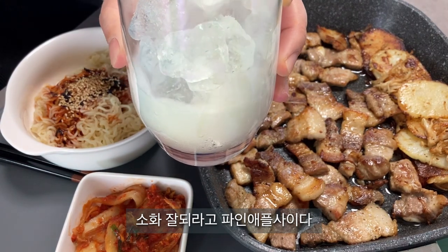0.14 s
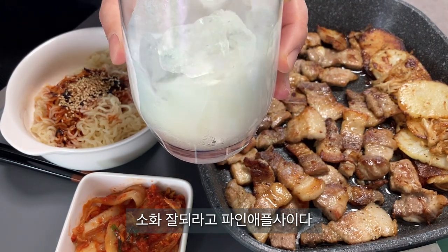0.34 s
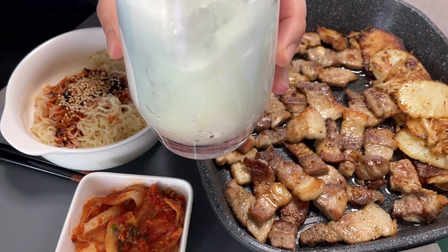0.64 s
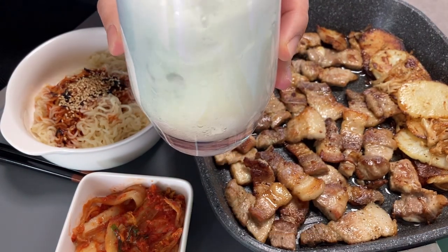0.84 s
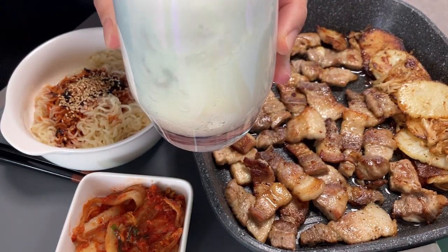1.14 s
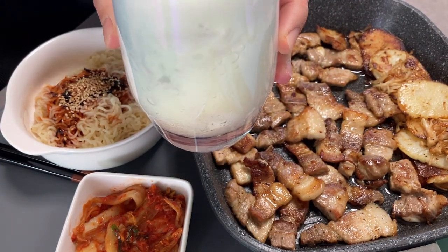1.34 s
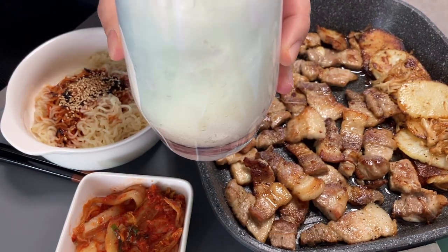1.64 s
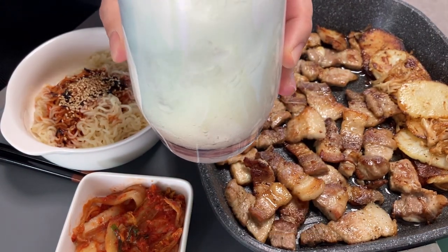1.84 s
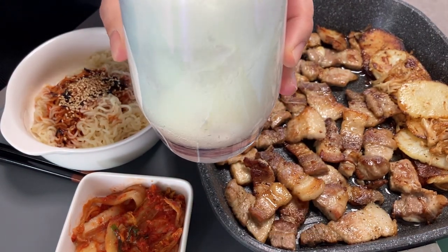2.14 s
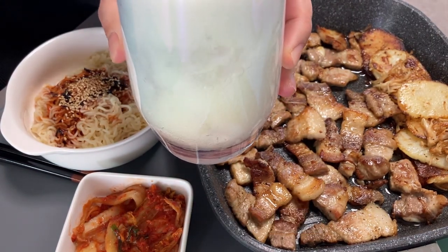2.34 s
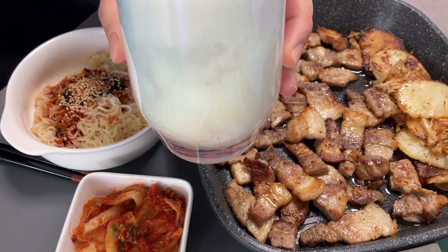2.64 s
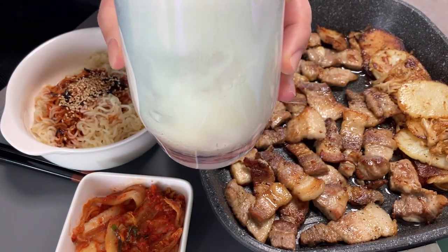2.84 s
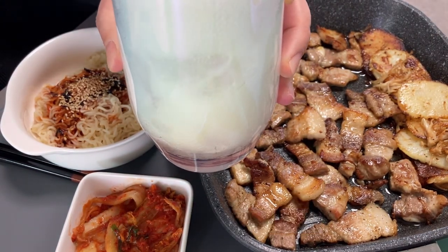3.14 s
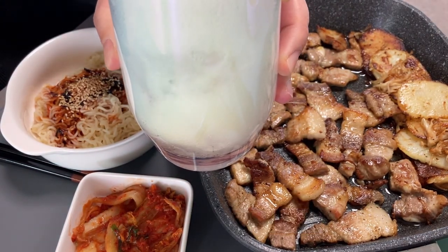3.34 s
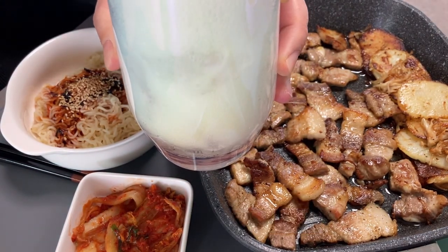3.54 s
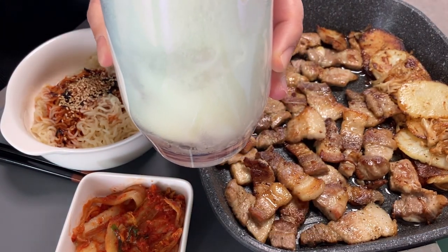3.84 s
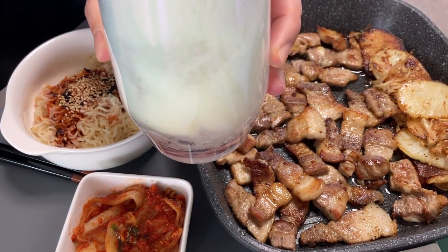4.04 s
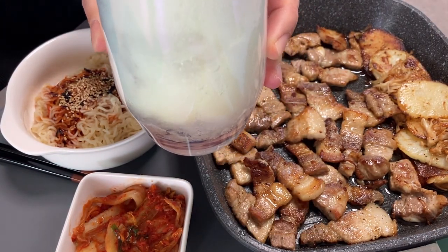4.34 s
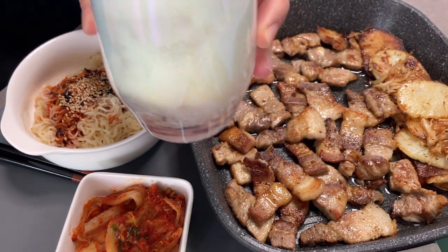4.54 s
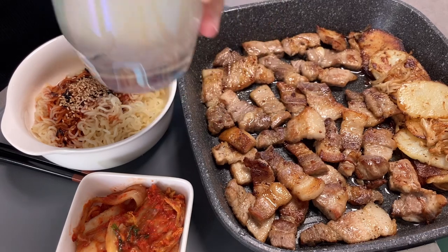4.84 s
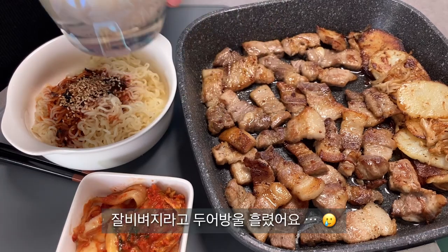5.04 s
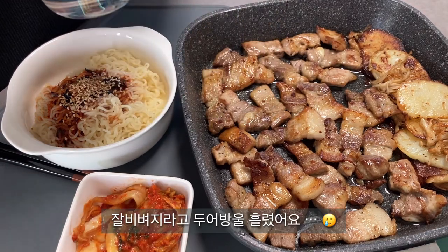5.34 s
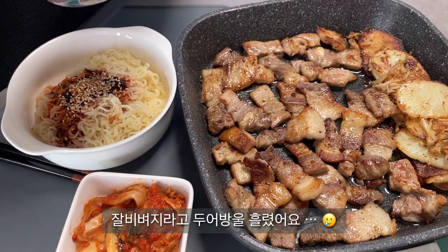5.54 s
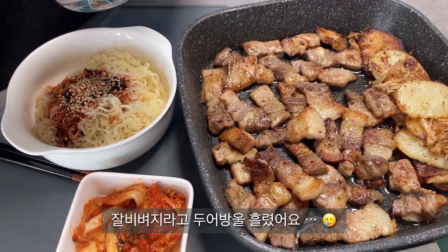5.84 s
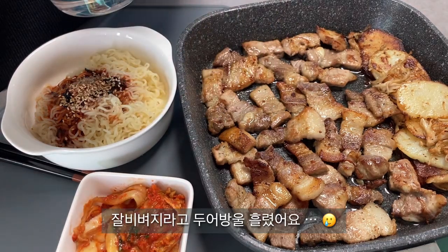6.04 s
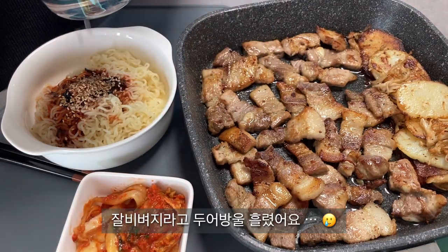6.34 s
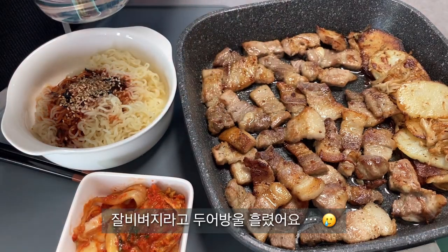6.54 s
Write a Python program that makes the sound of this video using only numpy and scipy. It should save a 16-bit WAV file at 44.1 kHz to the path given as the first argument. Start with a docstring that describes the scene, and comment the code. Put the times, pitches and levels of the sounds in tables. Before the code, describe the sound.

A close stereo phone pickup of fizzy drink over ice in a small, quiet kitchen. From 0 s a fine bright bubble hiss runs steadily while ice cracks in dry, glassy snaps, dense until about 2.1 s; the strongest come near 0.8, 1.25, 1.6, 1.7 and 2.0 s, some with a soft low thump and a sputter of gas. Quiet rising gulps, low and mid pitched, bubble up until 2.3 s. Then cracks are rare: 2.5, 2.9, a sharp pair at 3.3, faint ones at 4.05 and 4.55 s. The fizz thins while a faint hollow foam tone climbs. Around 5.25 s a soft airy swish, and at 5.4 s the glass lands with knocks and a strong woody rub, then slides in weaker juddering shoves, with gritty scrape and ticks, until about 6.3 s. Low room air and a thin whine to the right remain.

```python
"""Close on a phone, fizzy soda stands over ice in a glass: popping bubbles hiss, filtered noise bursts snap as ice.
Early on, rising tones gulp as trapped air escapes, and short falling thumps follow the big cracks.
Meanwhile the foam's hollow note, a moving resonance on tiny pops, climbs as the foam drains.
Near the end filtered noise swishes softly; the glass is set down and shoved over the table with judder, grit, ticks.
A small kitchen surrounds it all with short echoes, steady room air and a faint whine off to the right."""
import sys
import numpy as np
from scipy import signal
from scipy.fft import rfft, irfft, next_fast_len
from scipy.io import wavfile
from scipy.ndimage import uniform_filter1d, map_coordinates

SR = 44100
rng = np.random.default_rng(int(sys.argv[2]) if len(sys.argv) > 2 else 0)


def inscribe(sig):
    """Save sig as 16-bit PCM at rate SR to the path in sys.argv[1].

    A 1-D sig is mono; a 2-D sig holds one channel per row.
    Samples are clipped to [-1, 1] before scaling.
    """
    pcm = np.round(np.clip(np.atleast_2d(sig).T, -1, 1) * 32767)
    wavfile.write(sys.argv[1], SR, pcm.astype(np.int16))


N = 294588
TIME = np.arange(N) / SR


# ice cracks: start_s, relative level_db, relative body_db, brightness_db, list of cube pitch_hz
ICE_CRACKS = [(0.031, -34, -13, 2, [5400]), (0.0487, -18.5, -36, 12, [11000]),
              (0.1096, -34.5, -18, 2, [5000]), (0.221, -18.5, -7.5, -3, [4750, 7780, 13200, 3700]),
              (0.249, -30.5, -10, -1, [7740]), (0.308, -40, -3, -8, [7000]), (0.355, -30, -19, 12, [11500]),
              (0.3865, -37, -10, 0, [9800]), (0.683, -25, -10, 13, [14800]),
              (0.808, -10.5, -15.5, 14.5, [10800, 12900, 14800, 16200]), (0.819, -26.5, -5, 2, [8100]),
              (0.921, -35.5, -16, 6, [10800]), (1.066, -26, -14.5, 1, [11400, 10400]),
              (1.1627, -21.5, -12, 7.5, [10000, 12400, 11600]), (1.218, -22.5, -16, -7, [12300]),
              (1.2571, -14.5, -7, 1.5, [11000, 8704, 13820, 5000]), (1.468, -30.5, -11, 2, [11400]),
              (1.6058, -12, -15, 5.5, [12300, 8150, 11300, 4620]), (1.6121, -18, -10, 10, [12000, 14800]),
              (1.71, -9.5, -6.5, 19, [15400, 15700, 11800]), (1.7226, -30.5, -10, 4, [14700]),
              (1.831, -24.5, -51, 7, [13000, 15000]), (2.0273, -11, -8.5, 5.5, [7700, 8700, 14100]),
              (2.047, -39, -5, -14, [5100]), (2.0653, -35.5, -9, -1, [8700]),
              (2.4736, -26, -7.5, -4, [8600, 10800, 12000]), (2.9326, -32.5, -5, 4, [11000]),
              (3.2833, -12.5, -20.5, 0.5, [14500, 7600, 10370, 4730]),
              (3.288, -14, -13.5, 8, [11000, 10400, 12500]), (4.0457, -24, -5, -3, [7300, 8600, 12000]),
              (4.5547, -42.5, -3, 0, [7000]), (5.3164, -34.5, -5.5, -6, [10500])]
# colour of a crack: freq_hz, gain_db
ICE_COLOUR = [(700, -28), (1300, -13), (2200, -18), (3300, -19.5), (4800, -12.5), (6200, -10.5),
              (7300, -7.5), (8200, -4.5), (9200, -1), (11300, -6), (13200, -4.5), (15000, -7.5),
              (16300, -6)]
# rings of the filled glass: freq_hz, width_hz, lift_db
GLASS_RINGS = [(2330, 270, 5), (4730, 57, 3.5), (8300, 280, 9), (10900, 1800, 5), (12530, 750, 4.5),
               (14960, 1400, 6)]


def cracks(life_s=0.00082, decay_power=0.71, rise_s=0.0001, level_db=3.5, body_db=13, side_db=-9,
           split_db=9, room_db=-15, cube_width_hz=430, cube_db=10, neighbour_db=3):
    """Each fracture runs through a cube in a few milliseconds; cube and glass ring briefly, the room answers."""
    direct, thrown = np.zeros((2, N)), np.zeros((2, N))
    t = np.arange(SR // 30) / SR
    shape = np.exp(-(t / life_s) ** decay_power) * (1 - np.exp(-t / rise_s))
    # a single-sample click 0.4 ms into the burst
    split = amp(split_db) * (np.arange(len(t)) == SR // 2500)
    for start_s, db, body, bright, pitches in ICE_CRACKS:
        low_lift = body + body_db
        tint = [(3500, low_lift), (6000, low_lift / 2 - bright / 4), (8200, -bright / 2),
                (11000, 0), (14500, bright / 2)]
        colour = lambda hz: along(ICE_COLOUR, hz) + along(tint, hz)
        # strong modes of the cube, and weaker ones of its neighbours that differ from crack to crack
        cube = [(f, cube_width_hz, cube_db) for f in pitches]
        neighbours = [(f, cube_width_hz / 2, neighbour_db) for f in rng.uniform(2350, 8130, size=6)]
        rings = GLASS_RINGS + cube + neighbours
        burst = split + shape * spread(rng.standard_normal((2, len(t))), side_db)
        snap = coloured(burst, lambda hz: colour(hz) + lifts(rings, hz), size=1024)
        strength = amp(db + level_db) * np.sqrt(0.006 * SR)
        add(direct, start_s, strength * snap / np.linalg.norm(snap))
        # summed over all directions, the sound that reaches the walls has a smoother colour
        flash = coloured(np.array([split, split]), lambda hz: colour(hz) + lifts(cube, hz) / 2, size=1024)
        add(thrown, start_s, strength * flash / np.linalg.norm(flash))
    return direct + amp(room_db) * kitchen(thrown)


# state of the foam: time_s, hiss_db, relative seething_db, finest_fizz_db
FOAM_LEVELS = [(0, -45.5, -59, -62), (0.6, -44.5, -58.5, -50), (1.05, -47.5, -52, -59),
               (1.5, -48, -47, -78), (1.82, -53, -56.5, -67), (2.0, -51.5, -48.5, -74),
               (2.6, -50, -50.5, -58), (3.5, -49.5, -49.5, -53.5), (4.0, -51, -48.5, -48.5),
               (4.5, -52.5, -51.5, -54.5), (5.0, -56.5, -56.5, -58.5), (6.68, -58, -59.5, -58)]
# the foam's hollow note: time_s, pitch_hz, level_db
HOLLOW_NOTE = [(0, 606, -62), (1.2, 1080, -62.5), (2.35, 1240, -57), (3.2, 1600, -54.5), (4.1, 2440, -55),
               (5.3, 2650, -60)]
# colour of bursting bubbles: freq_hz, gain_db
HISS_COLOUR = [(2800, -22), (4000, -2.5), (5200, -5), (6800, 0), (8500, 3.5), (11000, 0.5), (13000, -0.5),
               (15500, -8.5)]
# colour inside the foam: freq_hz, gain_db
SEETHE_COLOUR = [(900, -15), (2200, -12), (3300, -1.5), (4600, 2), (6200, -3.5), (9000, -9)]
# colour of the finest bubbles at the top of the head: freq_hz, gain_db
FINE_COLOUR = [(6000, -18.5), (9000, -5), (11500, 2), (15500, -6.5)]
# air in the glass above the foam: freq_hz, width_hz, lift_db
AIR_SPACE_MODES = [(2690, 1960, 11)]


def foam(seethe_db=-4.0, sharpness=3.5, flutter_db=0.83, flare_db=11, deep_flare_db=12, flare_s=0.028,
         sputter_db=3, patch_db=1.77):
    """Thousands of bubbles burst each second; the foam resonates ever higher as it thins."""
    hiss, seethe, fine = curves(FOAM_LEVELS)
    top_pops = spread(pops(rate=14000, scatter_db=-1.0), -11.5)
    top = unit(coloured(top_pops, lambda hz: along(HISS_COLOUR, hz)))
    deep_pops = spread(pops(rate=9000, scatter_db=-1.5), -13.0)
    deep = unit(coloured(deep_pops, lambda hz: along(SEETHE_COLOUR, hz) + lifts(AIR_SPACE_MODES, hz)))
    head_pops = spread(pops(rate=22000, scatter_db=6.0), -2.3)
    head = unit(coloured(head_pops, lambda hz: along(FINE_COLOUR, hz)))

    # a resonance that follows the hollow note, excited by sparser pops
    hz, t, z = signal.stft(spread(pops(rate=2000, scatter_db=2.5), -14.5), SR, nperseg=512)
    note_s, note_hz, note_db = np.transpose(HOLLOW_NOTE)
    ratio = (hz[:, None] + 1) / np.interp(t, note_s, note_hz)
    peak = 1 / (1 + (sharpness / 2 * (ratio - 1 / ratio)) ** 2)
    note = unit(signal.istft(z * peak / np.linalg.norm(peak, axis=0), nperseg=512)[1][:, :N])

    # each crack frees a sputtering puff of gas
    freed = sum(amp(db) * swell(start_s, flare_s / 10, flare_s) for start_s, db, *_ in ICE_CRACKS)
    freed = freed * amp(sputter_db * wobble(150))
    surface = amp(hiss) * top + amp(fine) * head
    inside = amp(seethe + seethe_db) * deep
    fizz = (1 + amp(flare_db) * freed) * surface + (1 + amp(deep_flare_db) * freed) * inside
    # narrow bands of the fizz swell and fade at random
    fizz = amp(flutter_db * wobble(16)) * patchy(fizz, patch_db)
    return fizz + amp(np.interp(TIME, note_s, note_db)) * note


# air escaping from under the ice: start_s, pitch_hz, relative level_db, life_cycles to fall 60 dB
AIR_GULPS = [(.05, 151, -38, 8), (.127, 132, -31, 9.8), (0.3636, 754, -28, 15), (.46, 710, -39, 11),
             (.484, 116, -30, 7.3), (.522, 187, -41, 9), (0.885, 213, -37, 7.8), (0.9197, 740, -32.5, 11.5),
             (0.925, 250, -40, 12.5), (0.941, 850, -39, 17), (1.6125, 706, -23, 8.6),
             (2.0965, 626, -28, 3.7), (2.162, 105, -44, 6), (2.3005, 900, -36, 8.2)]


def gulps(climb=0.31, swell_cycles=1.08, slap=0.24, slap_t60_s=0.034):
    """A freed air pocket slaps the ice, then rings and rises in pitch on its way up."""
    out, t = np.zeros(N), np.arange(SR // 6) / SR
    for start_s, hz, db, life in AIR_GULPS:
        cycles = hz * t
        envelope = 2 * amp(-60 * cycles / life) * (1 - np.exp(-cycles / swell_cycles))
        ring = envelope * np.sin(2 * np.pi * cycles * (1 + climb * cycles / life))
        band = signal.butter(N=2, Wn=[hz / 2, hz * 2], btype="band", fs=SR)
        wet = unit(signal.lfilter(*band, rng.standard_normal(len(t))))
        add(out, start_s, amp(db) * (ring + slap * wet * amp(-60 * t / slap_t60_s)))
    return out


# jolts of the drink by big cracks: start_s, level_db
DRINK_JOLTS = [(0.8101, -28.5), (1.258, -32.5), (1.607, -36.5), (1.711, -43), (2.029, -42)]


def jolts(start_hz=600, end_hz=48, fall_s=0.0033, t60_s=0.11):
    """A big crack shoves the drink: a soft thump whose pitch drops at once."""
    out, t = np.zeros(N), np.arange(SR // 8) / SR
    hz = end_hz + (start_hz - end_hz) * np.exp(-t / fall_s)
    for start_s, db in DRINK_JOLTS:
        add(out, start_s, -amp(db - 60 * t / t60_s) * np.sin(2 * np.pi * np.cumsum(hz) / SR))
    return out


# shoves by the hand: strongest_s, length_s, relative level_db
HAND_SHOVES = [(5.466, 0.071, -35.5), (5.539, 0.062, -48), (5.683, 0.02, -54), (5.8, 0.028, -42.5),
               (5.88, 0.02, -49), (6.043, 0.076, -48), (6.113, 0.055, -44), (6.177, 0.07, -43)]
# colour of glass rubbing on the table: freq_hz, gain_db
RUB_COLOUR = [(40, -43), (100, -13), (170, -7.5), (270, 5.5), (400, -4.5), (530, -6.5), (780, -2),
              (1100, -8), (2200, -6), (4000, -13.5), (5700, -23), (9000, -15), (15000, -24)]
# table top rings: freq_hz, width_hz, lift_db where the glass lands, lift_db where it stops
TABLE_TOP_MODES = [(130, 40, 12, -2), (259, 22, 2, 1), (306, 27, 2, 4), (398.5, 23, 15, 7.5),
                   (545, 32, 0, 10), (677, 25, 3, 10), (755, 25, 3, 2), (814, 15, 4.5, 4), (972, 36, 0, 11),
                   (1212, 21, 11, 6)]
# colour of grains crushed under the base: freq_hz, gain_db
GRIT_COLOUR = [(1500, -34), (4000, -17), (5700, -13), (8000, -14), (12000, 6), (15500, -1)]


def slide(land_s=5.42, stop_s=6.236, onset_s=0.012, stop_fade_s=0.15, drag_db=-46, rumble_db=1, scrape_db=-5.0,
          rumble_db_per_s=-2.5, scrape_db_per_s=4.5, judder=0.3, uneven_db=-0.03, split_hz=1000,
          grit_db=-50, clump_db=4):
    """The base judders over the table in tiny slips, a drag that swells with each shove; grains crackle under it."""
    starting = (1 + np.tanh((TIME - land_s) / onset_s)) / 2
    stopping = (1 - np.tanh((TIME - stop_s) / stop_fade_s)) / 2
    moving = starting * stopping
    shoves = sum(amp(db) * swell(s, length / 2, length / 2) for s, length, db in HAND_SHOVES)
    effort = (amp(drag_db) * moving + shoves) * amp(uneven_db * wobble(30))
    elapsed = np.clip(TIME, land_s, stop_s) - land_s

    pressure = 1 + judder * np.tanh(2 * wobble(130))  # the base sticks and lets go
    drag = spread(pops(rate=7000, scatter_db=1.5) * pressure, -8.5)
    # the table rings differently from spot to spot: crossfade from landing to stopping
    land_modes = [(f, w, db) for f, w, db, _ in TABLE_TOP_MODES]
    stop_modes = [(f, w, db) for f, w, _, db in TABLE_TOP_MODES]
    first = coloured(drag, lambda hz: along(RUB_COLOUR, hz) + lifts(land_modes, hz), size=16384)
    last = coloured(drag, lambda hz: along(RUB_COLOUR, hz) + lifts(stop_modes, hz), size=16384)
    slips = first + (last - first) * elapsed / (stop_s - land_s)

    # the rumble thins as the hand eases off, and the rubbing turns to scrape along the way
    low = filtered(slips, lambda hz: 1 / (1 + (hz / split_hz) ** 6))
    rumble = amp(rumble_db + rumble_db_per_s * elapsed) * unit(low)
    scrape = amp(scrape_db + scrape_db_per_s * elapsed) * unit(slips - low)
    grains = spread(pops(rate=2100, scatter_db=3) * amp(clump_db * wobble(160)), 0)
    grit = unit(coloured(grains, lambda hz: along(GRIT_COLOUR, hz)))
    return effort * (rumble + scrape) + amp(grit_db) * moving * grit


# catches of the base: start_s, relative level_db, crispness_db
BASE_CATCHES = [(5.435, -33, -11), (5.455, -37, 6), (5.491, -39, 6), (5.521, -28.5, 3), (5.671, -42.5, 14),
                (5.932, -37.5, -4), (6.022, -32.5, -28), (6.067, -45, 17), (6.099, -47, 14),
                (6.15, -47, 22)]


def catches(knock_t60_s=0.027, tick_t60_s=0.012, knock_db=15, tick_db=20, side_db=-14, thump_db=-5):
    """Now and then the base catches and lets go: a sharp tick over a dull knock of the table."""
    out, t = np.zeros((2, N)), np.arange(SR // 20) / SR
    for start_s, db, crisp in BASE_CATCHES:
        grip = lambda t60: amp(db - 60 * t / t60) * spread(rng.standard_normal((2, len(t))), side_db)
        dull = [(300, thump_db), (2500, -1.5), (9000, -10)]
        sharp = [(300, -21), (2500, 2.5), (11000, crisp)]
        knock = coloured(grip(knock_t60_s), lambda hz: along(RUB_COLOUR, hz) + along(dull, hz))
        tick = coloured(grip(tick_t60_s), lambda hz: along(RUB_COLOUR, hz) + along(sharp, hz))
        add(out, start_s, amp(knock_db) * knock)
        add(out, start_s, amp(tick_db) * tick)
    return out


# soft swishes about the set-down: strongest_s, swell_s, fade_s, level_db
SOFT_SWISHES = [(5.25, 0.089, 0.048, -51.5), (5.35, 0.076, 0.19, -51.5)]
# colour of the swish: freq_hz, gain_db
SWISH_COLOUR = [(200, -15), (500, -7), (950, -2), (1400, -5.5), (2100, -10.5), (3200, -15), (6000, -25)]


def swish(side_db=-9):
    """A faint breath-like swish, filtered noise in two soft swells."""
    noise = spread(rng.standard_normal((2, N)), side_db)
    rush = unit(filtered(noise, lambda hz: amp(along(SWISH_COLOUR, hz))))
    swells = sum(amp(db) * swell(s, rise, fall) for s, rise, fall, db in SOFT_SWISHES)
    return swells * rush


# decay of the kitchen's echoes: freq_hz, t60_s
KITCHEN_DECAY = [(200, 0.072), (2000, 0.16), (9000, 0.27), (16000, 0.086)]


def kitchen(x, delay_s=.004):
    """The walls answer with a short diffuse tail."""
    hz, t, z = signal.stft(rng.standard_normal((2, SR // 2)), SR, nperseg=256)
    decay = amp(-60 * t / along(KITCHEN_DECAY, hz)[:, None])
    tail = signal.istft(z * decay, SR, nperseg=256)[1]
    tail = np.pad(tail / np.linalg.norm(tail[0]), ((0, 0), (round(delay_s * SR), 0)))
    return signal.fftconvolve(x.mean(axis=0)[None], tail, axes=1)[:, :N]


# colour of the kitchen's room air: freq_hz, gain_db
AIR_COLOUR = [(25, -11), (55, 0), (110, 3.5), (190, 5.5), (300, -5.5), (500, -12), (800, -10),
              (1200, -11.5), (2200, -14.5), (4000, -18.5), (6000, -52), (9000, -31), (15500, -41)]


def background(air_db=-52.0, hum_hz=882, drift_hz=1.12, hum_db=-62.5):
    """Steady room air is filtered noise; an appliance's thin whine is a drifting sine, off to the right."""
    noise = spread(rng.standard_normal((2, N)), -12.0)
    air = unit(filtered(noise, lambda hz: amp(along(AIR_COLOUR, hz))))
    hum = unit(np.sin(2 * np.pi * np.cumsum(hum_hz + drift_hz * wobble(24.77)) / SR))
    return amp(air_db) * air + amp(hum_db) * hum * amp([[-3], [2]])


def amp(db):
    """Decibels to gain."""
    return 10 ** (np.asarray(db) / 20)


def unit(x):
    """Scaled to rms 1."""
    return x / np.sqrt(np.mean(x ** 2) + 1e-20)


def along(points, hz):
    """(Hz, value) points read on a log axis."""
    f, v = np.transpose(points)
    return np.interp(np.log(hz + 1), np.log(f + 1), v)


def curves(rows):
    """One value per sample for each column after the time."""
    s, *cols = np.transpose(rows)
    return [np.interp(TIME, s, c) for c in cols]


def lifts(modes, hz):
    """The gain in dB that a set of resonances adds."""
    return sum(db / (1 + (2 * (hz - f) / w) ** 2) for f, w, db in modes)


def filtered(x, response):
    """x times a response of frequency."""
    m = next_fast_len(N + SR // 2)
    return irfft(rfft(x, m) * response(np.fft.rfftfreq(m, 1 / SR)), m)[..., :N]


def coloured(x, gain_db, size=4096):
    """x through a causal filter whose gain in dB is a function of frequency."""
    # folding the cepstrum onto positive times makes the filter minimum-phase
    cepstrum = irfft(np.log(amp(gain_db(np.fft.rfftfreq(size, 1 / SR)))))
    cepstrum[1:size // 2] *= 2
    cepstrum[size // 2 + 1:] = 0
    ring = irfft(np.exp(rfft(cepstrum)))
    return signal.fftconvolve(x, ring[None], axes=1)[:, :x.shape[1]]


def add(track, s, sound):
    """Mix a sound into the track at time s."""
    part = track[..., round(s * SR):][..., :sound.shape[-1]]
    part += sound[..., :part.shape[-1]]


def wobble(rate):
    """A smooth random curve, rate knots a second."""
    knots = rng.standard_normal(int(N * rate / SR) + 4)
    return map_coordinates(knots, [np.arange(N) * rate / SR])


def swell(peak_s, rise_s, fall_s):
    """A smooth hump of height 1."""
    return np.exp(-((TIME - peak_s) / np.where(TIME < peak_s, rise_s, fall_s)) ** 2)


def spread(x, side_db):
    """Two unrelated signals become a centre and a side."""
    side = amp(side_db) * x[1]
    return np.array([x[0] + side, x[0] - side])


def pops(rate, scatter_db):
    """Two streams of tiny random impulses of scattered size, rate a second."""
    hit = rng.random((2, N)) < rate / SR
    return unit(hit * rng.standard_normal((2, N)) * amp(scatter_db * rng.standard_normal((2, N))))


def patchy(x, depth_db):
    """Narrow bands swell and fade at random, each largely on its own."""
    z = signal.stft(x, nperseg=512)[2]
    field = uniform_filter1d(rng.standard_normal(z.shape[1:]), size=3, axis=0)  # smooth over frequency
    field = uniform_filter1d(field, size=7, axis=1)  # smooth over time
    return signal.istft(z * unit(amp(depth_db * unit(field))), nperseg=512)[1][:, :N]


def scene(room_db=-10, pan_db=0.16):
    """The glass close by, the kitchen around it; the glass comes down a little to the left."""
    drink = jolts() + gulps()
    table = (slide() + catches() + swish()) * amp([[pan_db], [-pan_db]])
    return cracks() + foam() + drink + amp(room_db) * kitchen(drink[None]) + table + background()


# phase between the phone's ports: freq_hz, radians by which left leads
PORT_LEAD = [(150, 0), (900, 1.1), (1500, 2.1), (2300, 3.2), (4500, 6.1), (5600, 7.9), (6700, 6.28),
             (9100, 3.14), (11400, 0), (13600, -3.14), (15600, -6.1)]
# stereo width: freq_hz, side_db
STEREO_WIDTH = [(50, 2), (150, -6), (350, 5.5), (700, 4), (5500, 7), (7500, -6), (15000, -79)]
# balance of the ports: freq_hz, left_minus_right_db
PORT_BALANCE = [(300, 0), (700, 4), (1500, 5), (3500, 2), (5000, 1.5), (8000, -0.5)]


def record(dry, top_hz=16150):
    """The phone's two ports: wide in the middle range, out of step in the treble, band-limited."""
    mid, side = (dry[0] + dry[1]) / 2, (dry[0] - dry[1]) / 2
    side = filtered(side, lambda hz: amp(along(STEREO_WIDTH, hz)))
    sign = np.array([[1], [-1]])
    lead = lambda hz: np.exp(1j * sign * np.interp(hz, *np.transpose(PORT_LEAD)) / 2)
    ports = lambda hz: amp(sign * along(PORT_BALANCE, hz) / 2) * lead(hz)
    pair = np.clip(filtered(mid + sign * side, ports), -1, 1)
    return filtered(pair, lambda hz: 1 / np.sqrt(1 + (hz / top_hz) ** 160))


dry = scene()
out = record(dry)
inscribe(out)
```